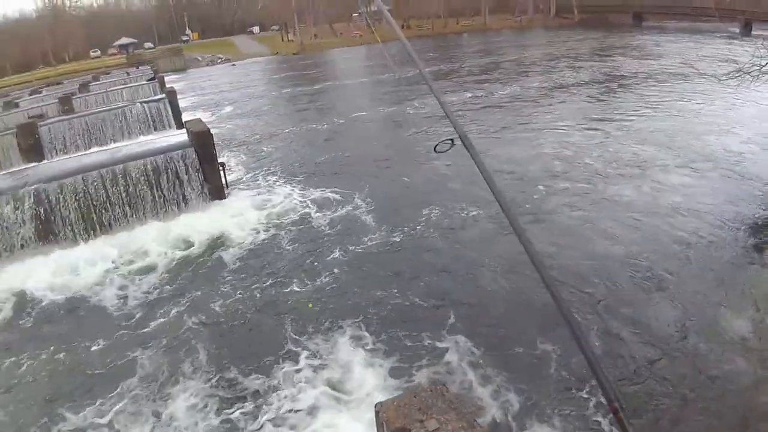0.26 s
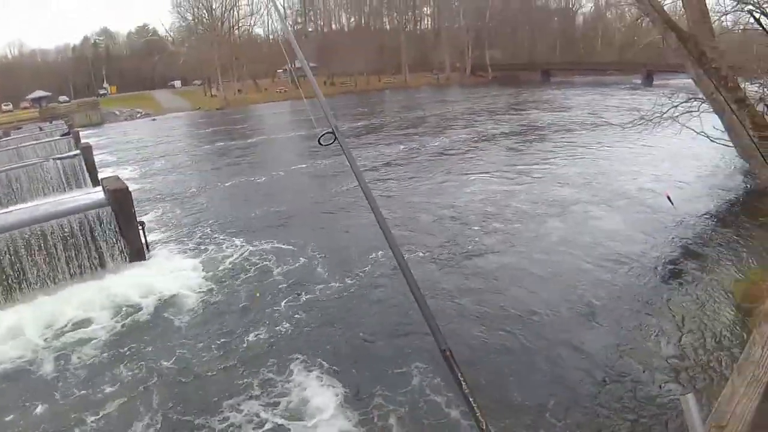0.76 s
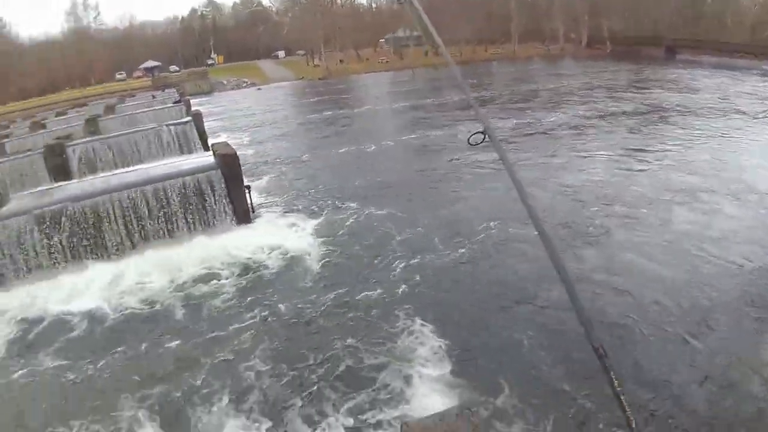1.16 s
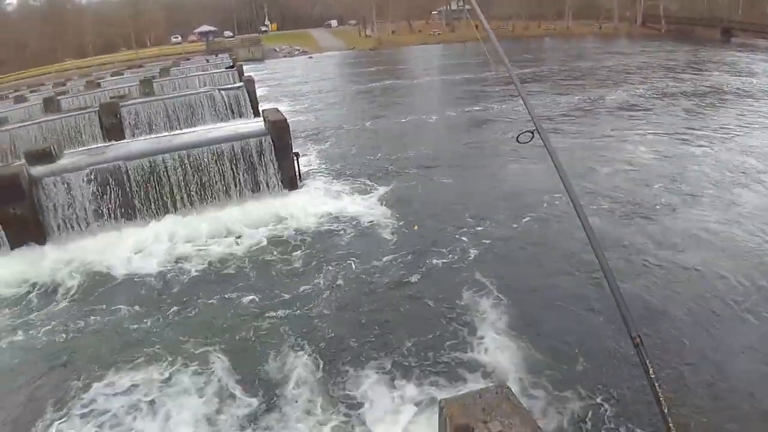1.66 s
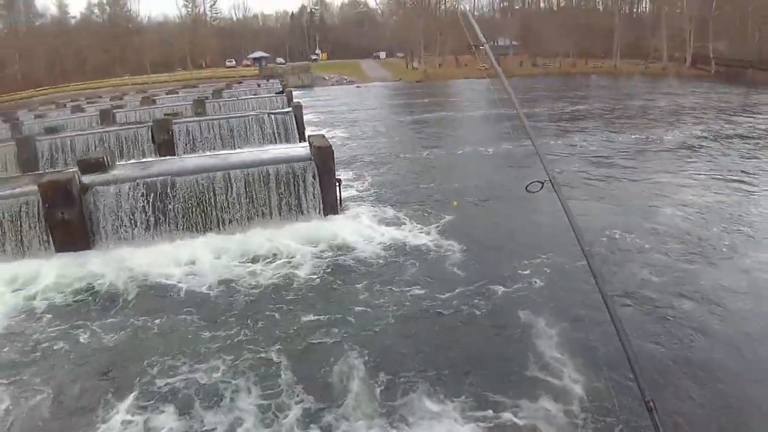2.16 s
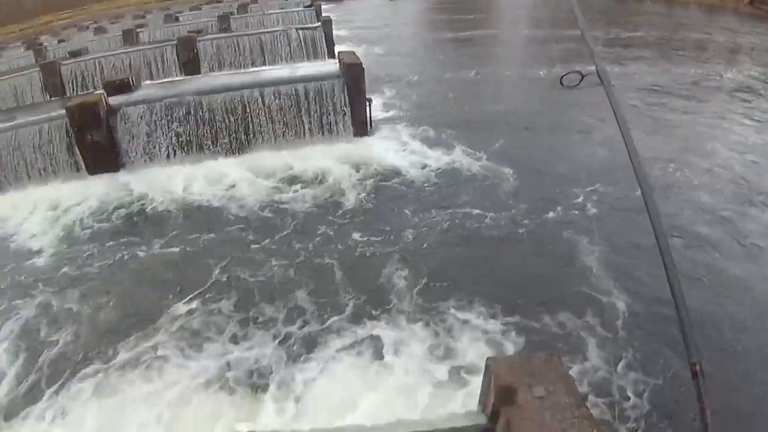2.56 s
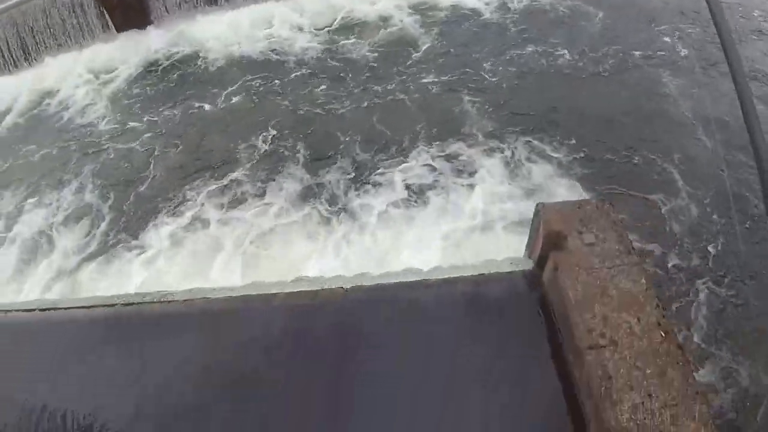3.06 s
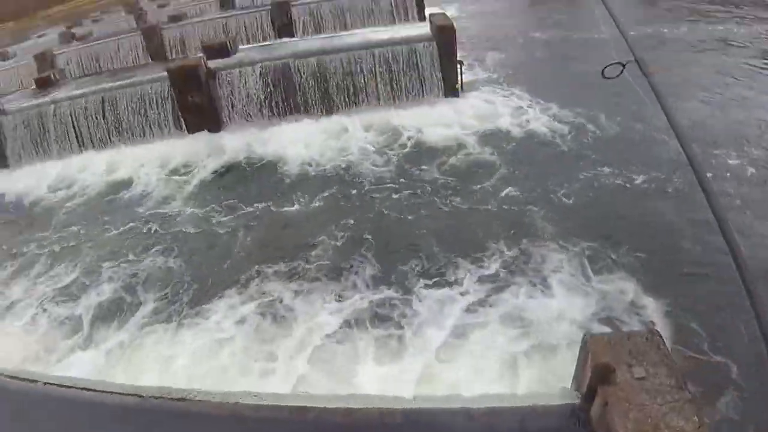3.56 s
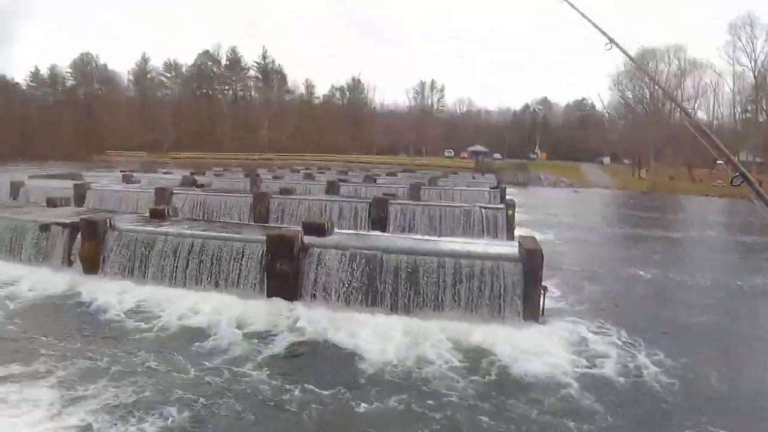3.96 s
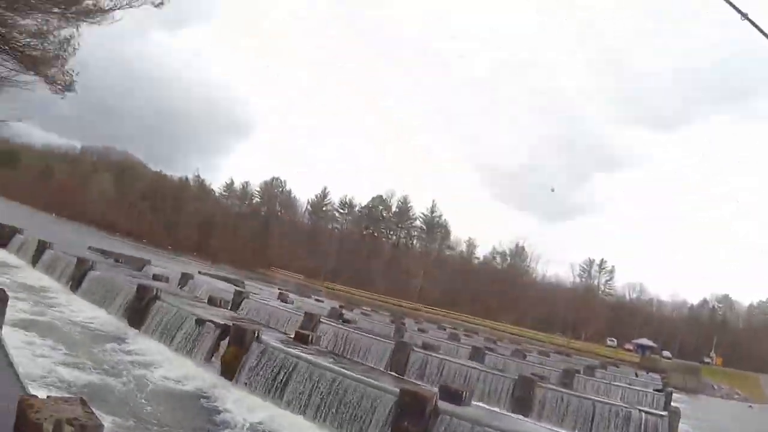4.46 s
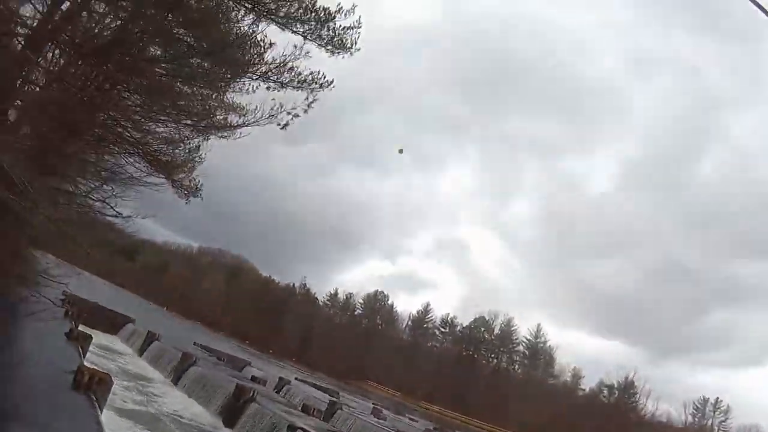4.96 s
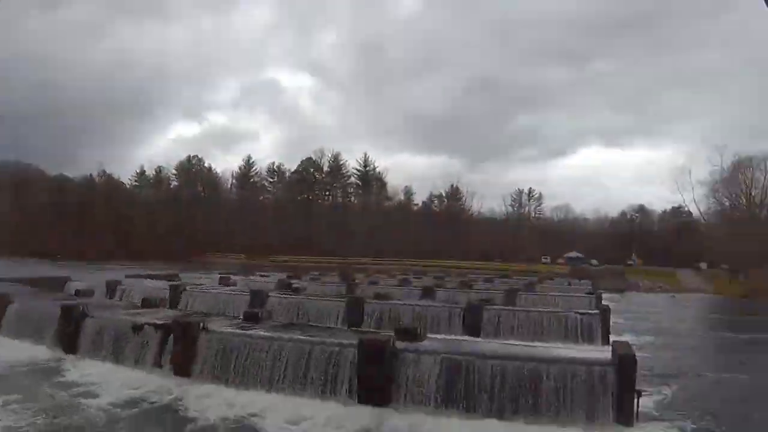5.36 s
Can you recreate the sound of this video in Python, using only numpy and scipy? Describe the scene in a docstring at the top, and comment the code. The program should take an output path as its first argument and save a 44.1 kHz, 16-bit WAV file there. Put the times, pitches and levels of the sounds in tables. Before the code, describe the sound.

Whitewater churns just below a stepped river weir, a loud continuous rush with bright foam hiss over bubbling gurgle. A body-worn camera hears it close up, stronger on the left. A faint squeak of the mount opens it; a bit past three seconds a hard tick hits the housing and the water briefly ducks. The tone then shifts as the camera turns toward the weir, with soft, nearly buried bumps.

```python
"""Weir whitewater rushes just below a small body-worn camera, heard through its two ports. Far steps merge into
octave bands of noise; near foam is clumped clicks ringing bubble-pitched resonators. Colour and stereo image
follow the turn of the camera; as it glances down, up or over the river, the body shades each range of the
water. The mount squeaks faintly, rumbles and bumps softly; a hard tick rings the housing, and a limiter ducks
everything on peaks over its ceiling."""
import sys
import numpy as np
from scipy import signal
from scipy.fft import rfft, irfft, next_fast_len
from scipy.io import wavfile
from scipy.ndimage import minimum_filter1d

SR = 44100
rng = np.random.default_rng(int(sys.argv[2]) if len(sys.argv) > 2 else 0)


def persist_wave(psi):
    """Save psi, clipped to +-1, as 16-bit WAV."""
    counts = np.round(np.clip(psi, -1, 1) * 32767).astype(np.int16)
    wavfile.write(sys.argv[1], SR, np.atleast_2d(counts).T)


N = 246959
TIME = np.arange(N) / SR
SIZE = next_fast_len(N, True)
BIN_HZ = np.maximum(np.fft.rfftfreq(SIZE, 1 / SR), 1)  # floor keeps the log finite


def from_db(db):
    """Decibels to gain."""
    return 10 ** (np.asarray(db) / 20)


def rms_one(x):
    """Scale to unit power."""
    return x / np.sqrt(np.mean(x ** 2) + 1e-20)


def in_time(rows):
    """Interpolate each column at every sample."""
    s, *columns = np.transpose(rows)
    return [np.interp(TIME, s, column) for column in columns]


def in_pitch(rows):
    """Interpolate each column at every FFT bin, on a log frequency axis."""
    hz, *columns = np.transpose(rows)
    return [np.interp(np.log(BIN_HZ), np.log(hz), column) for column in columns]


def arch(middle_s, length_s):
    """Raised cosine: a smooth rise from 0 to 1 and back."""
    return np.cos(np.pi * np.clip((TIME - middle_s) / length_s, -.5, .5)) ** 2


def drift(rate_hz):
    """Slow random curve, RMS 1: noise through two equal one-pole lowpasses at rate_hz."""
    step, warmup = 40, 2000  # samples per slow point; slow points dropped
    pole = np.exp(-2 * np.pi * rate_hz * step / SR)
    noise = rng.standard_normal(N // step + warmup + 2)
    slow = signal.lfilter([1], [1, -2 * pole, pole ** 2], noise)[warmup:]
    return np.interp(np.arange(N) / step, np.arange(len(slow)), rms_one(slow))


def ring(clicks, hz, t60_s):
    """Two-pole resonator: a unit click rings a cosine of height 1; zeros at DC and Nyquist."""
    radius = from_db(-60 / (t60_s * SR))
    angle = 2 * np.pi * hz / SR
    return signal.lfilter([.5, 0, -.5], [1, -2 * radius * np.cos(angle), radius ** 2], clicks + 1e-18)


def struck(blows, modes):
    """Every blow excites all the modes of a body."""
    clicks = np.zeros(N)
    for s, db in blows:
        clicks[round(s * SR)] = from_db(db)
    return sum(from_db(db) * ring(clicks, hz, t60_s) for hz, db, t60_s in modes)


# Turn of the camera. Each row: time in seconds, turn from the pool (0) to the weir (1).
CAMERA_TURN = [(0, 0.18), (2.3, 0.35), (3.3, 0.31), (3.5, 0.4), (3.9, 0.6), (4.7, 0.96), (5.2, 0.86),
               (5.6, 0.48)]
# Glances of the camera, down at the water, up, or over the river, each shading the ports through the body, by
# range, with a lean to the left. Each row: middle in seconds, # length in seconds, low roar in dB, gurgle in
# dB, foam hiss in dB, fine spray in dB, lean to the left in dB.
CAMERA_GLANCES = [(.1, 2.1, -1.5, 0, 0, 0, 0), (0.71, 0.81, 0.5, 0.5, -0.3, -0.5, 0.6),
                  (1.35, 1.1, 0, -0.7, -0.3, -0.2, 0.2), (2.5, .9, 0.2, 0, 0.2, 0, 0),
                  (3.0, 1.1, 1.2, 0, 0.25, -1, -0.2), (3.9, .6, 0.5, 0, 0.5, 0.5, 0),
                  (4.7, 1.2, -0.5, 0.6, -.8, -.4, -0.1), (5.45, 0.78, 0, 0, .5, -0.5, .2)]
LEAN_DB = -1.06  # left over right, before the shades
MIDTURN_HISS_DB, MIDTURN_SPRAY_DB = 0.26, 2.3  # boost at half turn, for what the port crossfade cancels


def stance():
    """Turn of the camera, lean dB, and slow dB of each range from low roar to fine spray."""
    turn = np.clip(in_time(CAMERA_TURN)[0], 0, 1)
    mid_turn = np.sin(np.pi * turn)
    shades_db = sum(np.outer(shade_db, arch(s, length_s)) for s, length_s, *shade_db in CAMERA_GLANCES)
    low_db, gurgle_db, hiss_db, spray_db, lean_db = shades_db
    hiss_db = hiss_db + MIDTURN_HISS_DB * mid_turn
    spray_db = spray_db + MIDTURN_SPRAY_DB * mid_turn
    return turn, LEAN_DB + lean_db, (low_db, gurgle_db, hiss_db, spray_db)


def roar(surge, surge_db, patchy_db):
    """Far bubbles merge into noise; each octave of bubble sizes wavers by itself and with the surge."""
    white = rfft(rng.standard_normal((2, SIZE)))
    octave = np.clip(np.log2(BIN_HZ / 60), 0, 8).astype(int)
    out = 0
    for k in np.unique(octave):
        band = irfft(white * (octave == k), SIZE)[:, :N]
        out = out + band * from_db(surge_db * surge + patchy_db * drift(18))
    return rms_one(out)


def bubbles(surge, low_hz, high_hz, per_s, cycles, spread_db, clump_db, count):
    """Near bubbles are born in clumps; each rings for its cycles to -60 dB at the pitch of its size."""
    births = per_s * from_db(clump_db * (surge + drift(20))) / SR  # chance per sample
    strengths = from_db(spread_db * np.minimum(rng.exponential(1, N), 4)) * rng.choice([-1, 1], N)
    clicks = strengths * (rng.random(N) < births)
    dealt = rng.integers(0, count, N)
    pitches_hz = np.geomspace(low_hz, min(high_hz, SR / 2), count)
    out = sum(hz * ring(clicks * (dealt == k), hz, cycles / hz) for k, hz in enumerate(pitches_hz))
    return rms_one(out) * np.sqrt(2 * (high_hz - low_hz) / SR)  # same power per Hz as unit white noise


def ports(direct, diffuse, facing):
    """Two ports share the water, shaded and delayed by the camera body, and partly hear their own."""
    colour_db, balance_db, alike, lead_rad = in_pitch(facing)
    alike = np.clip(alike, 0, 1)
    sign = np.array([[1], [-1]])  # left, right
    shade = from_db(sign * balance_db / 2)
    shade = from_db(colour_db) * shade / np.sqrt(np.mean(shade ** 2, axis=0))
    pair = np.sqrt(1 + alike) * direct + sign * np.sqrt(1 - alike) * diffuse
    return rms_one(irfft(pair * shade * np.exp(sign * .5j * lead_rad), SIZE)[:, :N])


# Base colour of the whitewater. Each row: frequency in Hz, relative density in dB per Hz.
RUSH_COLOUR = [(25.0, -42), (60.0, -21.5), (110.0, -25), (150.0, -20.5), (200.0, -19.5), (300.0, -12.5),
               (500.0, -8.0), (1300.0, -7.5), (2300.0, -5), (3400.0, -2.5), (4600.0, -0.65), (5500.0, -3.5),
               (6800.0, -13), (9500.0, -18.5), (15000.0, -32.5)]
# Port response facing the pool. Each row: frequency in Hz, colour in dB, left over right in dB,
# likeness 0-1, left lead in radians.
POOL_PORTS = [(60, -2, 3, 0.87, 0), (250, 1.7, 5.5, 0.92, -0.04), (780, 0, 6.5, 0.9, -0.74),
              (930, 2.5, 5, 1, -1), (1410, 0, 8, 0.64, -0.45), (1910, 0.5, 9.5, 0.52, 0.5),
              (2700, -0.5, 10, 0.84, 1.4), (3800, 1, 13.5, 0.65, 0.65), (4600, 1, 12.5, 0.6, 0.3),
              (5500, -0.8, 4.5, 0.9, 1.02), (6030, 0, 2.5, 0.4, 1.5), (9400, -1.5, 3.5, 0.27, 3),
              (14000, 2, 9, 0.5, 2.5)]
# Port response facing along the weir. Each row: frequency in Hz, colour in dB, left over right in dB,
# likeness 0-1, left lead in radians.
WEIR_PORTS = [(60, -2, 3, 0.7, 0), (250, 1.5, 5.5, 0.98, -0.0067), (770, -1, 5, 0.93, 0.34),
              (1000, -0.9, 5.5, 0.97, 0.039), (1430, 2, 5.5, 0.97, -0.036), (1700, -2, 4.5, 0.84, -0.2),
              (2700, -1.4, 6.5, 0.78, -0.054), (3800, 0.05, 8.5, 0.87, -0.48), (4760, 0.8, 9.5, 0.5, -0.17),
              (5300, 0.5, 1, 0.75, -1.44), (6640, 0.5, 0, 0.83, -0.87), (9500, -0.5, 1.5, 0.52, -0.073),
              (14000, 4, 3.5, 0.16, -0.073)]
GAP_HZ, GAP_WIDTH_HZ = 7878, 2060
RANGE_EDGES_HZ = (520, 2400, GAP_HZ)  # low roar | gurgle | foam hiss | fine spray
RUSH_DB = -17  # base gain on the unit-power water
SWELL_DB, SWELL_S = -6.5, 0.053  # starts this far down, swells in over this time


def whitewater():
    """Roar, gurgling bubbles and fine spray surge together and shift as the camera turns."""
    turn, lean_db, ranges_db = stance()
    surge = drift(5.5)
    direct, diffuse = roar(surge, surge_db=0.05, patchy_db=.5)
    gurgle = from_db(-5.5) * bubbles(surge, low_hz=281.0, high_hz=2545, per_s=1800, cycles=21,
                                     spread_db=3.0, clump_db=1.0, count=48)
    spray = from_db(-5.5) * bubbles(surge, low_hz=2600, high_hz=13200, per_s=6000, cycles=8,
                                    spread_db=4.5, clump_db=2.0, count=20)
    colour = from_db(in_pitch(RUSH_COLOUR)[0])
    direct, diffuse = colour * rfft([direct + gurgle + spray, from_db(0.75) * diffuse], SIZE)
    at_pool = ports(direct, diffuse, POOL_PORTS)
    at_weir = ports(direct, diffuse, WEIR_PORTS)
    spectrum = rfft((1 - turn) * at_pool + turn * at_weir, SIZE)
    ranges = np.searchsorted(RANGE_EDGES_HZ, BIN_HZ)
    heard = sum(from_db(db) * irfft(spectrum * (ranges == k), SIZE)[:, :N]
                for k, db in enumerate(ranges_db))
    swell_db = SWELL_DB * np.maximum(1 - TIME / SWELL_S, 0)
    return heard * from_db(RUSH_DB + swell_db + lean_db * np.array([[.5], [-.5]]))


def treble_gap(x):
    """A bandstop leaves a dark gap in the treble around 7.9 kHz."""
    edges_hz = [GAP_HZ - GAP_WIDTH_HZ / 2, GAP_HZ + GAP_WIDTH_HZ / 2]
    return signal.sosfilt(signal.butter(4, edges_hz, "bandstop", fs=SR, output="sos"), x)


# Faint rising squeak of the mount. One row: middle in seconds, length in seconds,
# pitch at the middle in Hz, mean peak level in dB.
MOUNT_SQUEAK = (.032, .09, 1880, -25.3)
SQUEAK_RISE_HZ_PER_S = 1400


def squeak(jitter, rough_db):
    """The mount squeaks: a rising sine, uneven in pitch and level."""
    middle_s, length_s, middle_hz, level_db = MOUNT_SQUEAK
    pitch_hz = middle_hz + SQUEAK_RISE_HZ_PER_S * np.minimum(TIME - middle_s, length_s)
    pitch_hz = pitch_hz * (1 + jitter * drift(120))
    level = from_db(level_db + rough_db * drift(90)) * np.sqrt(arch(middle_s, length_s))
    return level * np.sin(2 * np.pi * np.cumsum(pitch_hz) / SR)


def shuffle_rumble(level_db, top_hz):
    """The wearer shifts stance: independent low noise in each port under one slow arch."""
    band = signal.butter(2, [35, top_hz], "band", fs=SR, output="sos")
    rumble = rms_one(signal.sosfilt(band, rng.standard_normal((2, N))))
    return from_db(level_db) * arch(middle_s=3.6, length_s=5.5) * rumble


# Hard tick on the housing and its rebounds. Each row: time in seconds, strength in dB.
TICK_BLOWS = [(3.28626, 11), (3.28645, 5), (3.28719, 3)]
# Housing modes. Each row: frequency in Hz, relative level in dB, t60 in seconds.
HOUSING_MODES = [(3700, -12, 0.01), (4330, -9, 0.007), (5500, -.5, 0.0026), (6600, -11.5, 0.008),
                 (9480, -19.5, 0.0105), (12100, -18, 0.002)]


def housing_tick(right_db, right_lead_samples):
    """The plastic shell rings for a few milliseconds, straight into both microphones."""
    shell = struck(TICK_BLOWS, HOUSING_MODES)
    n = np.arange(N)
    return np.array([shell, from_db(right_db) * np.interp(n + right_lead_samples, n, shell)])


# Soft bumps of the mount. Each row: time in seconds, strength in dB before the lowpass.
MOUNT_BUMPS = [(3.865, -24.5), (4.865, -30)]
# Mount modes. Each row: frequency in Hz, relative level in dB before the lowpass, t60 in seconds.
MOUNT_MODES = [(144, -2, 0.055), (230, 0.5, .05)]


def bumps(soft_hz):
    """Blows ring the mount modes; padded contact lowpasses them."""
    lowpass = signal.butter(2, soft_hz, fs=SR, output="sos")
    return signal.sosfilt(lowpass, struck(MOUNT_BUMPS, MOUNT_MODES))


def scene():
    """Weir water with its treble gap, plus noises on the camera itself."""
    water = treble_gap(whitewater())
    mount = squeak(jitter=0.04, rough_db=4) + bumps(soft_hz=380)
    mount = mount * from_db([[0], [-6.5]])  # left, right
    rumble = shuffle_rumble(level_db=-54.0, top_hz=260)
    tick = housing_tick(right_db=-4.0, right_lead_samples=1.15)
    return water + mount + rumble + tick


def limiter(x, ceiling_db, attack_s, hold_s, release_db_per_s):
    """Peaks over the ceiling duck both channels; the gain holds, then climbs back evenly in dB."""
    over_db = np.maximum(20 * np.log10(np.abs(x).max(axis=0) + 1e-9) - ceiling_db, 0)
    release_db = release_db_per_s * TIME
    duck_db = np.maximum.accumulate(over_db + release_db) - release_db
    half = int(hold_s * SR / 2)
    duck_db = -minimum_filter1d(-duck_db, 2 * half + 1, origin=half)  # max over the past hold_s
    pole = np.exp(-1 / (attack_s * SR))
    return x * from_db(-signal.lfilter([1 - pole], [1, -pole], duck_db))


def record(dry):
    """The limiter ducks, what escapes it clips, and an elliptic lowpass cuts the top."""
    limited = limiter(dry, ceiling_db=2.0, attack_s=0.0017, hold_s=0.021, release_db_per_s=172)
    lowpass = signal.ellip(10, .2, 70, 15150, fs=SR, output="sos")  # ripple dB, stop dB, cutoff Hz
    return signal.sosfilt(lowpass, np.clip(limited, -1, 1))


dry = scene()
out = record(dry)
persist_wave(out)
```